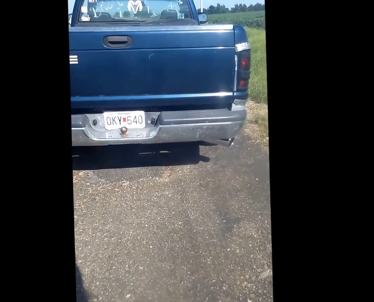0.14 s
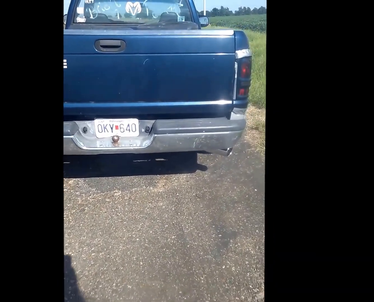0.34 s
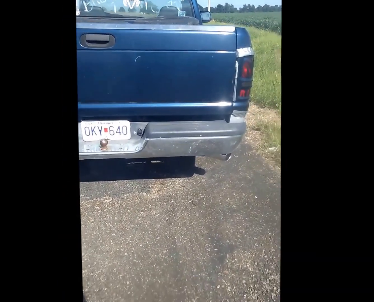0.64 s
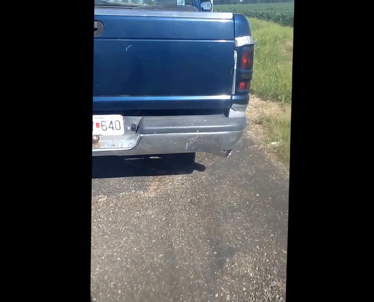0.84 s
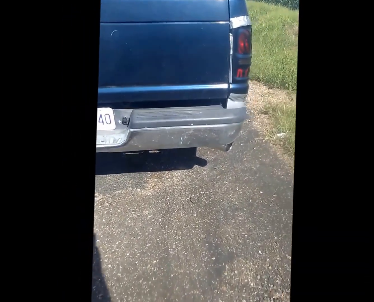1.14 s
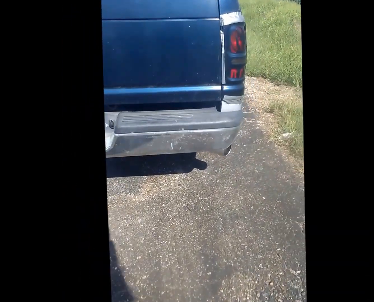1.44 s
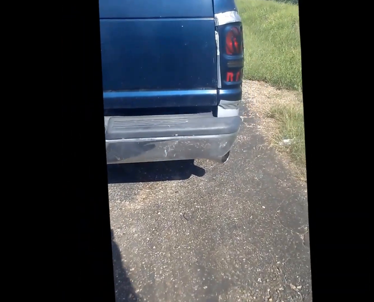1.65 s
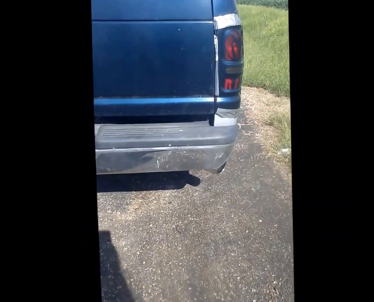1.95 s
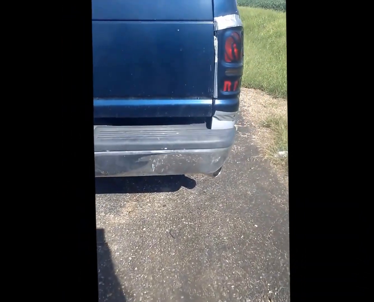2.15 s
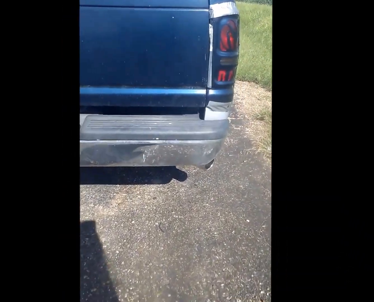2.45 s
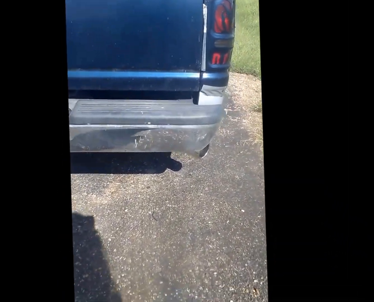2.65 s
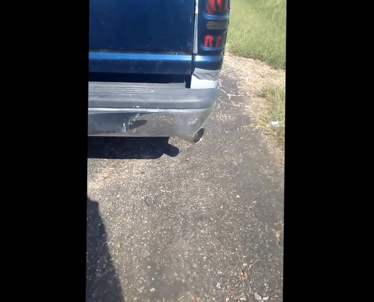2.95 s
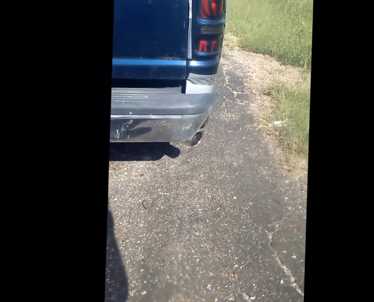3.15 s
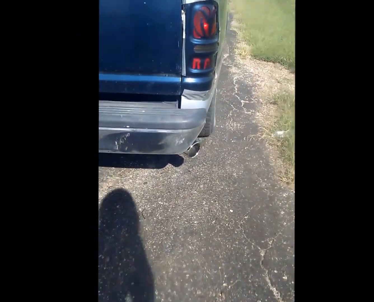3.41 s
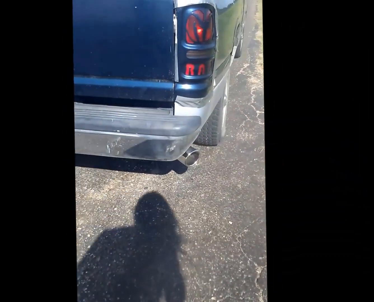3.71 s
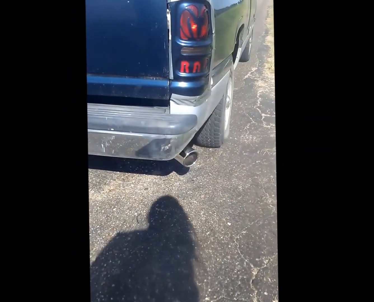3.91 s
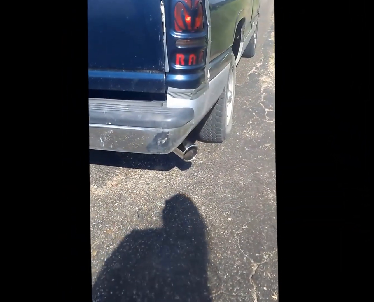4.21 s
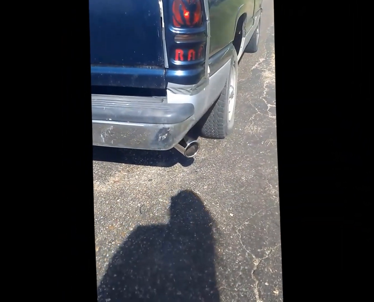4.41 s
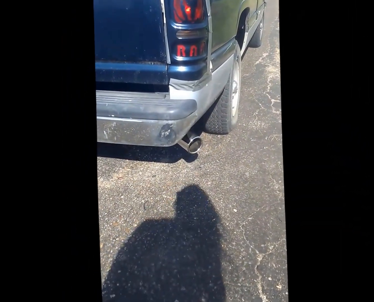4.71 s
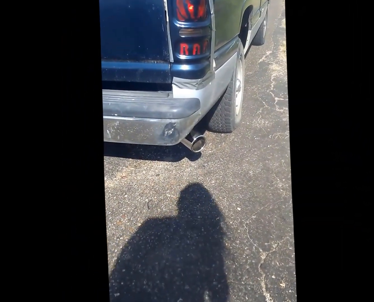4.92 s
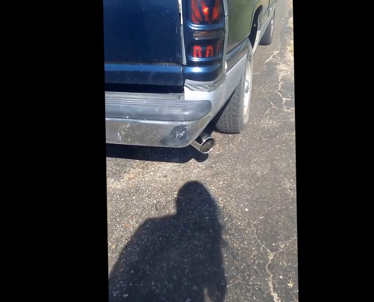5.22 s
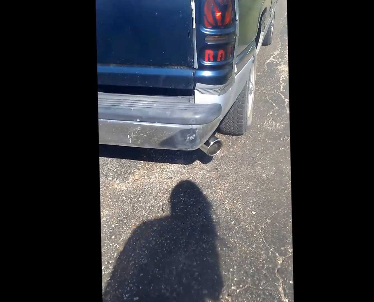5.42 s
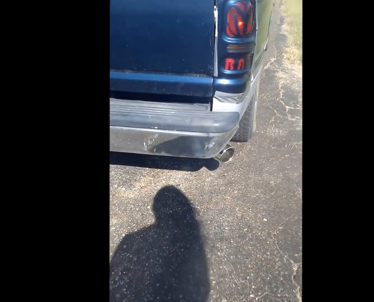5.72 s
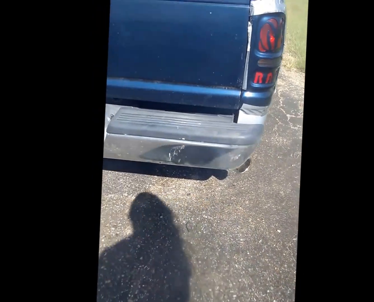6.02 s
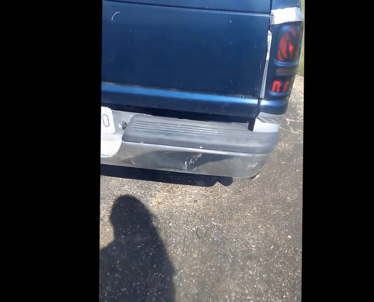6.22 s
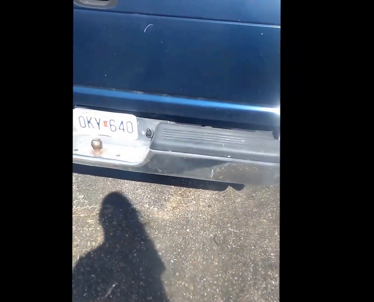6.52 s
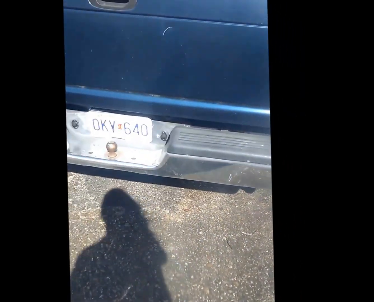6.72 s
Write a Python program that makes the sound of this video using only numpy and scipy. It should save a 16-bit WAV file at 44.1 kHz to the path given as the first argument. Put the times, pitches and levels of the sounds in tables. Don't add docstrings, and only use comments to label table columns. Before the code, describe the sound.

A heavy truck idles outdoors, its lumpy low beats loping about five and a half cycles a second, each holding eight uneven firings. A hand-held phone moves around the tail: broad burble and airy engine hiss first, then a fuller boom and metallic whooping throb close to the exhaust, then away again. Breeze pushes the microphone throughout, with rougher buffets late. A few dry grit ticks appear. Gain pumping makes the hiss flutter between beats.

```python
import sys
import numpy as np
from scipy import signal
from scipy.fft import rfft, irfft
from scipy.io import wavfile
from scipy.ndimage import uniform_filter1d

SR = 44100
rng = np.random.default_rng(int(sys.argv[2]) if len(sys.argv) > 2 else 0)


def dump_mix(stems):
    frames = np.atleast_2d(stems).T
    limited = np.clip(frames, -1, 1)
    pcm = np.round(limited * 32767).astype(np.int16)
    wavfile.write(sys.argv[1], SR, pcm)


def undo_db(level):
    steps = np.asarray(level, float) / 20
    return 10 ** steps


N = 302526
t = np.arange(N) / SR
hz = np.fft.rfftfreq(N, 1 / SR)

# (time [s], cycles done [count])
IDLE_CYCLES = [(0.0, -0.0154), (0.68, 3.6828), (1.3, 7.036), (1.7, 9.2313), (3.06, 16.6483), (3.45, 18.771),
               (4.08, 22.1687), (4.76, 25.8585), (5.55, 30.152), (6.8, 36.9779)]
BANK_OF = np.array([0, 1, 1, 0, 1, 0, 0, 1])
# (blowdown level [dB], lateness [ms])
CYLINDER_BLOWS = [(-0.93, -0.31), (4.7, -0.01), (3.21, -0.37), (3.61, -0.57), (4.37, -0.02), (-1.21, 0.66),
                  (5.47, 0.23), (3.75, 0.4)]
RAP_LEVELS = [-20, -8, -2, -2.5, -9.5, 0, -2.5, -7]
# (delay [ms], signed gain [ratio])
FAR_ECHOES = [(67.24, -0.25), (85.58, 0.49), (108.32, -0.37), (118.78, -0.39)]
# (delay [ms], signed gain [ratio])
NEAR_ECHOES = [(67.63, -0.31), (80.64, 0.4), (82.31, -0.49), (99.72, -0.77), (109.61, -0.3),
               (117.17, -0.39), (126.56, -0.26)]
# (time [s], facing the pipe mouth [0-1], in line with the gap under the bumper [0-1])
PHONE_WALK = [(0, 0.2, 0), (.5, 0.36, 0.16), (1.0, 0.73, 0.39), (2.1, 0.76, 0.75), (3.1, 0.76, 0.58),
              (3.5, 1, 1), (4.05, 0.97, 0.95), (4.8, 1, 1), (5.6, 0.96, 0.93), (6.0, 0.68, 0.68),
              (6.3, 0.86, 0.48), (6.86, .6, 0.28)]
# (frequency [Hz], width [Hz], level [dB])
STEEL_MODES = [(204.46, 15.2, 4.5), (248.8, 17.6, -5.5), (278.4, 28.4, -3.5), (307.3, 26.5, -11.5),
               (357.6, 8.9, -11), (403.7, 45, -35.5)]
# (frequency [Hz], width [Hz], level [dB])
ROAR_MODES = [(400, 22.5, 12), (475.5, 46, -17), (570, 24, 5), (661.3, 32, 5.5), (860, 57, -2),
              (1072, 120, -4.5), (1553, 36, -16.5), (1922, 62, -9.5)]
# (time [s], air hiss level [dB])
BAY_VIEW = [(0, -39.5), (.4, -43.5), (.8, -37), (1.0, -41.5), (1.68, -44.5), (2.16, -42.5), (3.0, -46),
            (4.5, -46.5), (4.8, -40.5), (5.55, -49), (5.68, -43.5), (5.92, -44.5), (6.1, -51.5),
            (6.29, -44), (6.45, -52), (6.86, -49.5)]
# (frequency [Hz], density [dB per Hz])
HISS_COLOUR = [(590, 2), (1000, -3), (1160, -13), (1360, -8), (1570, -4), (1770, -7), (1920, -8),
               (2520, -6.5), (2840, -6.5), (4600, -9.5), (5960, -1.5), (8730, -4.5), (10200, -15),
               (11000, -51), (14300, -33), (22000, -120)]
# (frequency [Hz], density [dB per Hz])
AIR_COLOUR = [(5880, -35), (10000, -11), (12000, -10.5), (13700, -1), (14500, -1.5)]
# (time [s], rumble level [dB])
BREEZE_LEVEL = [(0, -17), (1.0, -18.5), (2.0, -19.5), (2.5, -25), (3.3, -19.5), (3.8, -25), (4.3, -23.5),
                (5.3, -22.5), (5.7, -30), (5.95, -15.5), (6.86, -18.5)]
# (frequency [Hz], density [dB per Hz])
BREEZE_COLOUR = [(6, -20), (15, -12), (28, -5.5), (50, -4.5), (100, -8), (200, -13), (350, -32), (700, -50),
                 (1500, -79)]
# (time [s], peak level [dB], length [s])
GUST_EVENTS = [(0, -8.5, 0.14), (0.543, -12, 0.083), (1.06, -13, .1), (1.18, -11, 0.051),
               (1.754, -17.5, 0.16), (2.512, -23, 0.11), (3.008, -15, 0.045), (4.743, -19, .15),
               (5.967, -11, 0.39), (6.294, -10.5, 0.19), (6.454, -11, .1), (6.736, -13, .1)]
# (time [s], peak level [dB], pitch [Hz])
GRIT_CRACKS = [
    (0.414, -16, 5800),
    (0.414, -26.5, 2500),
    (1.67, -34, 2080),
    (2.026, -35, 2160),
    (2.026, -36, 5000),
    (2.241, -35, 2100),
    (3.377, -29.5, 1690),
    (3.83, -32, 5460),
    (4.202, -34, 3000),
    (5.018, -25, 5260),
]
# (time [s], peak level [dB], length [s], brightness [Hz])
WIND_SLAPS = [(1.776, -22, 0.039, 353), (5.895, -13.5, 0.041, 337), (5.919, -17, 0.051, 420),
              (5.965, -18.5, 0.06, 560), (6.059, -16.5, 0.044, 410), (6.34, -25, 0.025, 610),
              (6.4, -15, .07, 400), (6.407, -20, .05, 805), (6.416, -35, .03, 1490),
              (6.483, -23, 0.027, 486), (6.497, -31, 0.033, 560), (6.578, -29, .035, 440),
              (6.703, -19.5, 0.022, 557), (6.79, -22, 0.022, 377), (6.823, -23, 0.026, 480)]

# (level turned away [dB], gain when facing or in line [dB])
FAR_DB, FAR_TILT_DB = (1.0, -1.0), (-1.2, 1.0)
NEAR_DB, NEAR_TILT_DB = (-1.5, 4.1), (-4.8, 5.8)
BOOM_DB, RING_DB, LOPE_DB = (-26, 15.5), (-22.5, 2), (-43, 24)
ROAR_DB, TIP_DB, BRIGHT_DB = (-50, 8), (-64, 25), (1.5, -2)


def evened(x):
    return x / np.sqrt(np.mean(x ** 2) + 1e-20)


def curves(rows):
    s, *columns = np.transpose(rows)
    return [np.interp(t, s, column) for column in columns]


def law(rule, control):
    return rule[0] + rule[1] * control


def coloured(points):
    f, db = np.transpose(points)
    gain = undo_db(np.interp(np.log(hz + 1), np.log(f + 1), db, left=-90, right=-90))
    return evened(irfft(rfft(rng.standard_normal(N)) * gain, N))


def resonate(x, centre_hz, width):
    turn = np.exp(2j * np.pi * np.cumsum(centre_hz + 0 * t) / SR)
    r = np.exp(-np.pi * width / SR)
    return 2 * (turn * signal.lfilter([1 - r], [1, -r], x / turn)).real


def clicks(moments, sizes):
    at = np.round(moments * SR).astype(int)
    inside = (at >= 0) & (at < N)
    return np.bincount(at[inside], sizes[inside], N)


def firings():
    s, done = np.transpose(IDLE_CYCLES)
    count = np.arange(int(done[0]) * 8 - 8, int(done[-1]) * 8 + 8)
    edge = np.clip(count / 8, done[0], done[-1])
    mean_cycle_s = (s[-1] - s[0]) / (done[-1] - done[0])
    moment = np.interp(edge, done, s) + (count / 8 - edge) * mean_cycle_s
    return count % 8, moment, rng.standard_normal((len(count), 3))


def exhaust(cylinder, moment, chance):
    blow_db, late_ms = np.transpose(CYLINDER_BLOWS)[:, cylinder]
    size = undo_db(46.5 + blow_db) * undo_db(0.77 * chance[:, 0])
    start = moment + (late_ms + .1 * chance[:, 1]) / 1000
    j = 1j * hz
    puff = (j / 50) / (1 + j / 50) / (1 + j / 130) ** 2
    puff = puff / (1 + (hz / 156) ** 18) * (hz / 30) ** 6 / (1 + (hz / 30) ** 6)
    upper = 1 / (1 + (95 / (hz + 1)) ** 6)
    facing, in_line = curves(PHONE_WALK)
    out = 0
    pipes = (FAR_ECHOES, FAR_DB, FAR_TILT_DB), (NEAR_ECHOES, NEAR_DB, NEAR_TILT_DB)
    for bank, (pipe, level, tilt) in enumerate(pipes):
        mine = np.array(BANK_OF)[cylinder] == bank
        arrivals = sum(clicks(start[mine] + ms / 1000, gain * size[mine]) for ms, gain in pipe)
        z = puff * rfft(arrivals)
        level_db, tilt_db = law(level, in_line), law(tilt, facing)
        out = out + undo_db(level_db - 1.2 * tilt_db) * irfft(z * (1 - upper), N)
        out = out + undo_db(level_db + 0.1 * tilt_db) * irfft(z * upper, N)
    boom_hz, boom_width_hz = 114.3, 7
    boom = resonate(resonate(out, boom_hz, boom_width_hz), boom_hz, boom_width_hz)
    boom_rms = np.sqrt(uniform_filter1d(boom ** 2, size=SR // 3) + 1e-9)
    return out - boom + boom / boom_rms * undo_db(law(BOOM_DB, in_line) - 1.85)


def gas_fronts(cylinder, moment, chance):
    arrive = moment + .0695 + 0.00041 * chance[:, 1]
    return arrive, np.array(RAP_LEVELS)[cylinder] + 1.2 * chance[:, 2]


def tailpipe_steel(cylinder, chance, arrive, rap_db):
    facing, in_line = curves(PHONE_WALK)
    fronts = clicks(arrive, undo_db(rap_db) * (2 * np.array(BANK_OF)[cylinder] - 1))
    ring = 0
    for f, width, db in STEEL_MODES:
        mode_hz = f * (1 + 0.049 * (in_line - .6) * (f < 220))
        mode = evened(resonate(resonate(fronts, mode_hz, width), mode_hz, 0.71 * width))
        ring = ring + undo_db(db + law(BRIGHT_DB, facing) * (f > 330)) * mode
    u = t[:int(.042 * SR)]
    whoop_hz = np.geomspace(190, 350, len(u))
    whoop = np.sin(2 * np.pi * np.cumsum(whoop_hz) / SR) * np.hanning(len(u))
    lope_clicks = clicks(arrive - .011, undo_db(2.7 * chance[:, 0]) * (cylinder == 3))
    lope = signal.oaconvolve(lope_clicks, whoop)[:N]
    ring_db, lope_db = law(RING_DB, in_line), law(LOPE_DB, in_line ** 2)
    return undo_db(ring_db - 1.66) * evened(ring) + undo_db(lope_db - 8.5) * evened(lope)


def pipe_gas(gate):
    facing, _ = curves(PHONE_WALK)
    gas = rng.standard_normal(N) * (1.8 + evened(gate))
    roar = 0
    for f, width, db in ROAR_MODES:
        roar = roar + undo_db(db) * evened(resonate(resonate(gas, f, width), f, 1.03 * width))
    tip_hz, tip_width_hz = 725, 61
    tip = evened(resonate(resonate(gas, tip_hz, tip_width_hz), tip_hz, 2.5 * tip_width_hz))
    return undo_db(law(ROAR_DB, facing) + 1.9) * evened(roar) + undo_db(law(TIP_DB, facing) - 2.7) * tip


def engine_bay(gate):
    air_db = curves(BAY_VIEW)[0]
    hiss_db = -45.5 + 0.51 * (air_db + 41.5)
    hiss = undo_db(hiss_db + 3.0) * coloured(HISS_COLOUR) + undo_db(air_db + 1.5) * coloured(AIR_COLOUR)
    lumps = evened(uniform_filter1d(rng.standard_normal(N), size=1500))
    stir = undo_db(1.04 * evened(gate) + 1.7 * lumps)
    belt_db, hidden_db, hide_s, fade_s = -46, -55, 1.3, 0.072
    whistle_db = hidden_db + (belt_db - hidden_db) / (1 + np.exp((t - hide_s) / fade_s))
    whistle = evened(resonate(rng.standard_normal(N), 8260, 110))
    return stir / np.sqrt(np.mean(stir ** 2)) * hiss + undo_db(whistle_db) * whistle


def breeze():
    lump_db, lump_s, gust_top_hz = 2.5, .07, 93
    lumpy = evened(uniform_filter1d(rng.standard_normal(N), size=int(lump_s * SR)))
    rumble = undo_db(curves(BREEZE_LEVEL)[0] + lump_db * lumpy) * coloured(BREEZE_COLOUR)
    gusts = sum(undo_db(db) * np.exp(-(2 * (t - s) / length) ** 2) for s, db, length in GUST_EVENTS)
    push_gain = hz / (1 + (hz / 20) ** 2) / (1 + (hz / gust_top_hz) ** 4)
    push = evened(irfft(rfft(rng.standard_normal(N)) * push_gain, N))
    return undo_db(2.0) * (rumble + gusts * push)


def grit():
    burst, out = np.hanning(300), np.zeros(N)
    for s, db, f in GRIT_CRACKS:
        band = signal.butter(2, [f * 0.89, f * 1.28], "band", fs=SR)
        crack = signal.lfilter(*band, rng.standard_normal(300))
        out[int(s * SR) - 80:][:300] += undo_db(db - 8) * evened(crack) * burst
    return out


def wind_slaps():
    out = np.zeros(N)
    for s, db, length, bright_hz in WIND_SLAPS:
        n = int(np.clip(length, .01, .09) * SR)
        grain_db = 2.0 * evened(uniform_filter1d(rng.standard_normal(4000), size=150))
        lumps = rng.standard_normal(4000) * undo_db(grain_db)
        band = signal.butter(3, [150, 1.084 * bright_hz], "band", fs=SR, output="sos")
        puff = signal.sosfilt(band, lumps)[:n]
        slap = undo_db(db - 3.0) * evened(puff) * np.hanning(n)
        begin = int(s * SR) - n // 4
        out[begin:][:n] += slap[:N - begin]
    return out


def scene():
    cylinder, moment, chance = firings()
    arrive, rap_db = gas_fronts(cylinder, moment, chance)
    gate = signal.lfilter([1], [1, -np.exp(-1 / (0.01 * SR))], clicks(arrive, undo_db(1.15 * rap_db)))
    truck = exhaust(cylinder, moment, chance) + tailpipe_steel(cylinder, chance, arrive, rap_db)
    truck = truck + pipe_gas(gate) + engine_bay(gate)
    return (truck + breeze() + grit() + wind_slaps())[None]


def top_cut(x):
    return signal.sosfilt(signal.butter(12, 15600, fs=SR, output="sos"), x)


def record(dry):
    keep = np.exp(-1 / (0.0022 * SR))
    power = signal.lfilter([(1 - keep) ** 2], [1, -2 * keep, keep ** 2], dry ** 2)
    settling = 0.65 * np.exp(-t / 0.0096)
    held = dry * undo_db(-.4 * (10 * np.log10(power + 0.0011 + settling) + 8.5))
    soft = held / (1 + (held / 1.01) ** 6) ** (1 / 6) - .005
    soft = np.pad(soft, ((0, 0), (511, 511)), "reflect", reflect_type="odd")
    low_pass = signal.firwin(1023, 14270, window=("kaiser", 9), fs=SR)
    limited = signal.oaconvolve(soft, low_pass[None], "valid")
    edge_s = .004
    limited = limited * np.clip(.45 + np.minimum(t, t[-1] - t) / edge_s, 0, 1)
    return top_cut(limited)


dry = scene()
out = record(dry)
dump_mix(out)
```